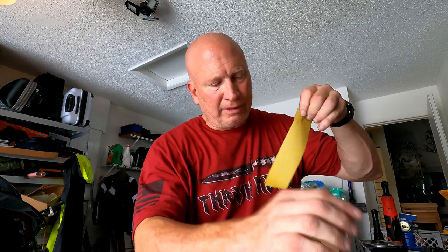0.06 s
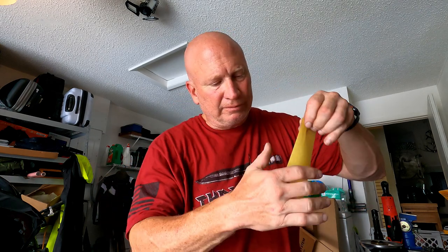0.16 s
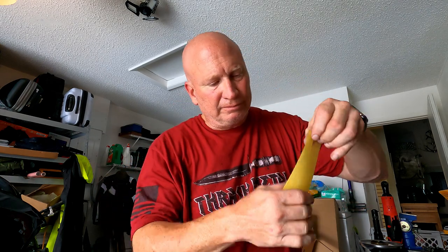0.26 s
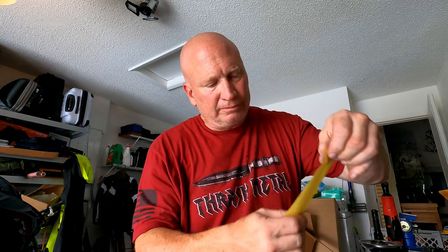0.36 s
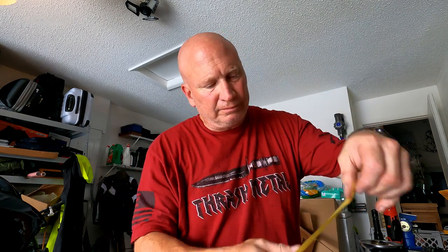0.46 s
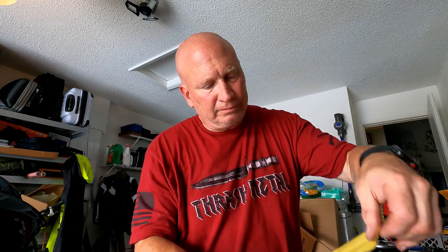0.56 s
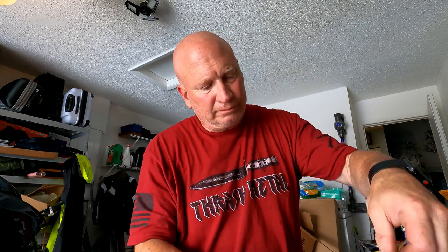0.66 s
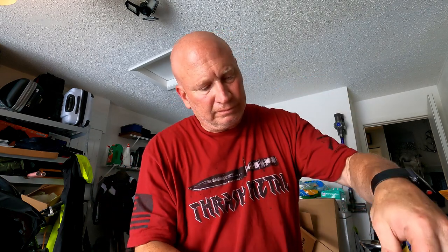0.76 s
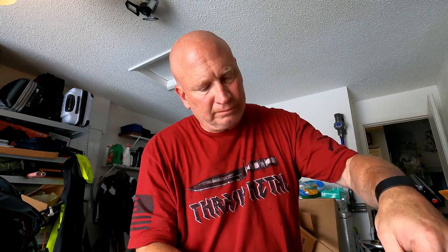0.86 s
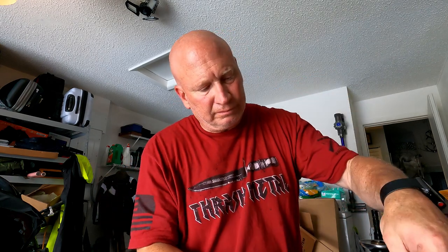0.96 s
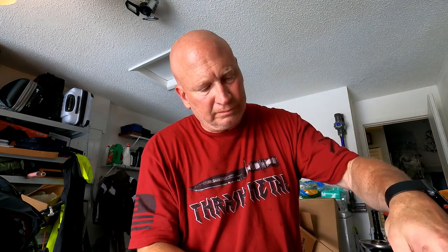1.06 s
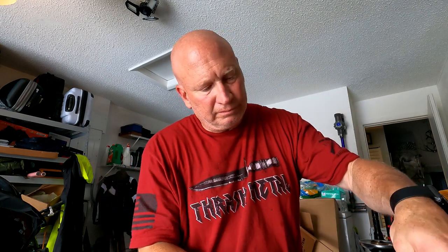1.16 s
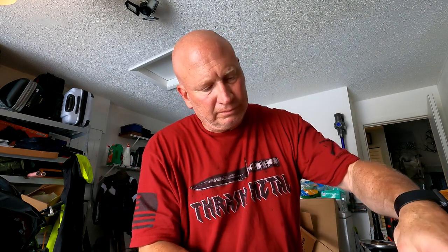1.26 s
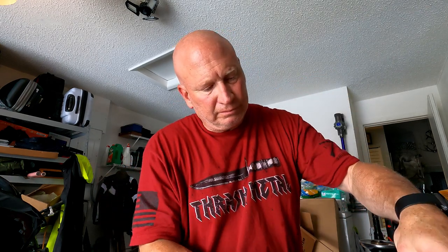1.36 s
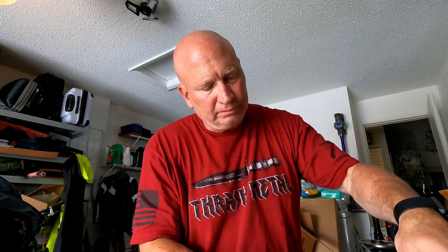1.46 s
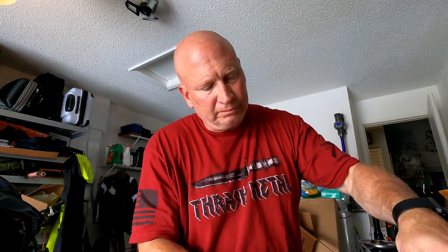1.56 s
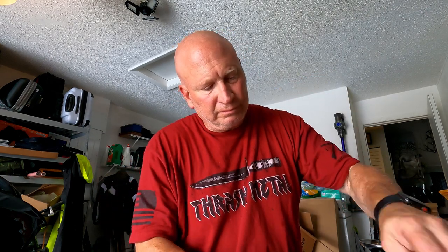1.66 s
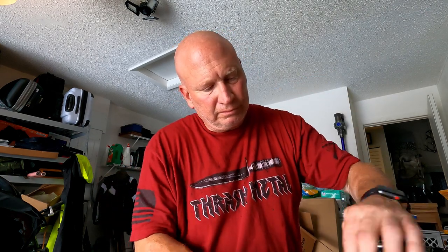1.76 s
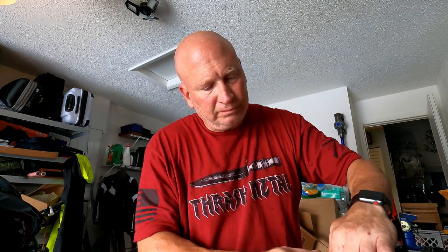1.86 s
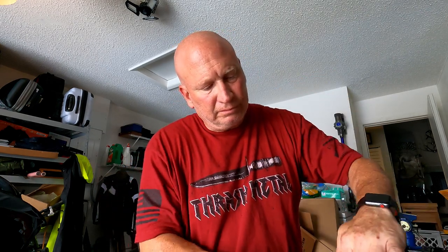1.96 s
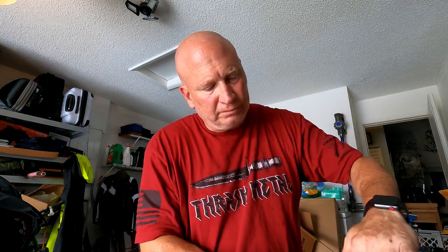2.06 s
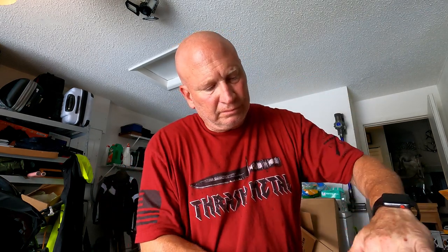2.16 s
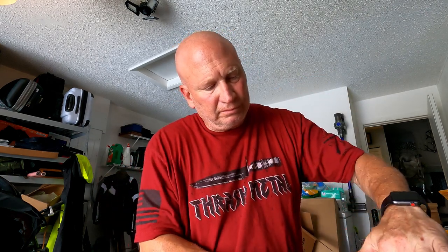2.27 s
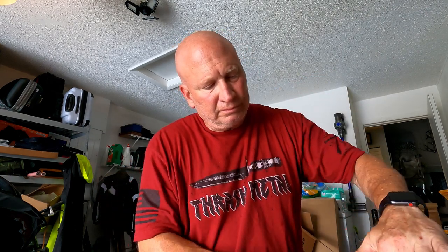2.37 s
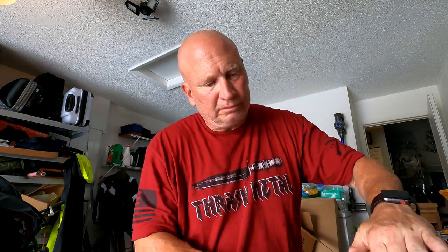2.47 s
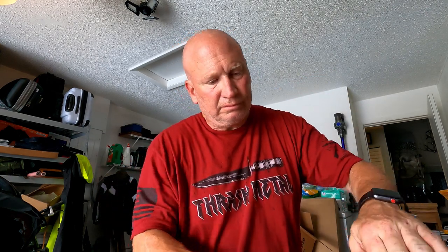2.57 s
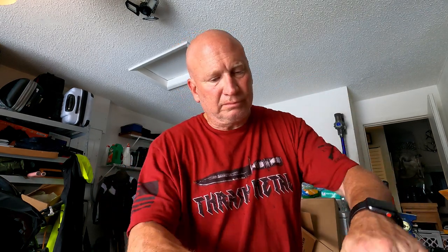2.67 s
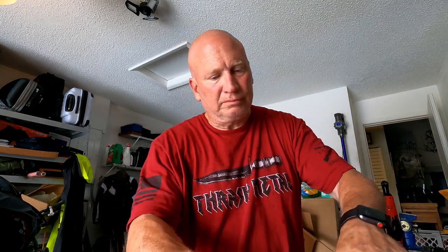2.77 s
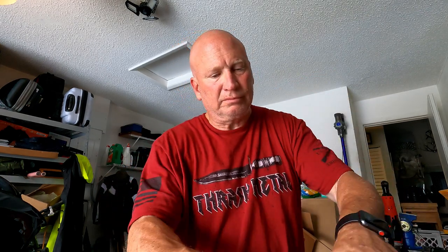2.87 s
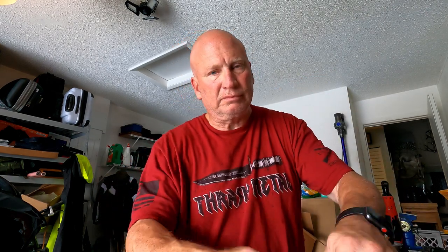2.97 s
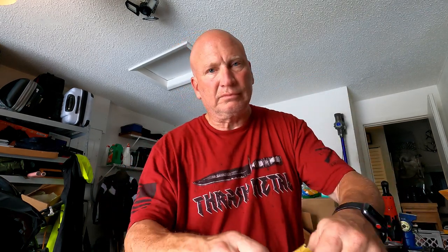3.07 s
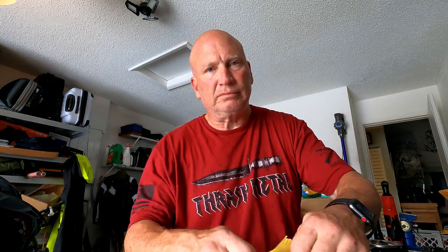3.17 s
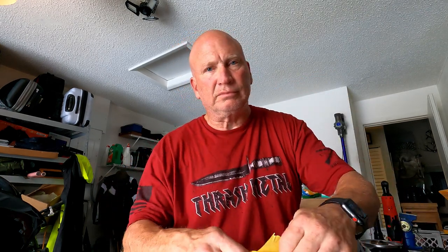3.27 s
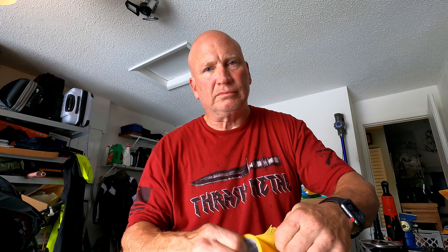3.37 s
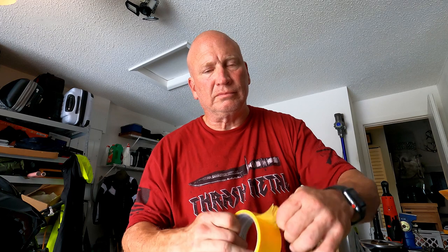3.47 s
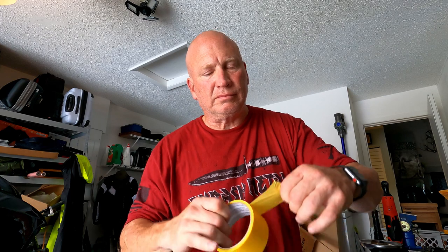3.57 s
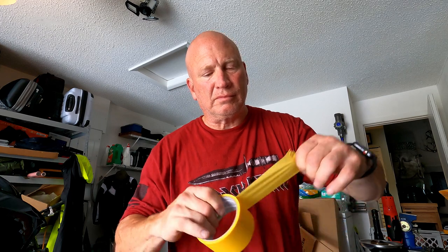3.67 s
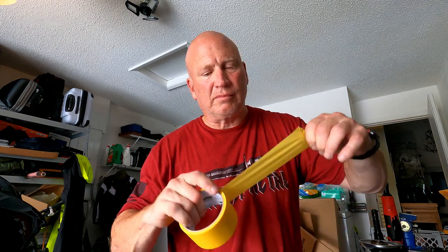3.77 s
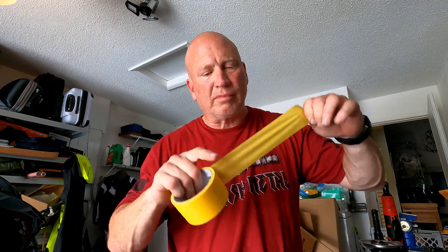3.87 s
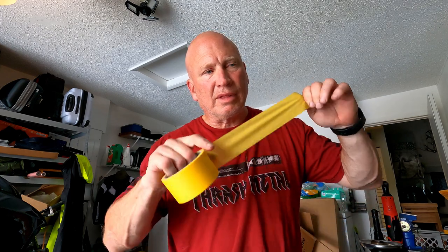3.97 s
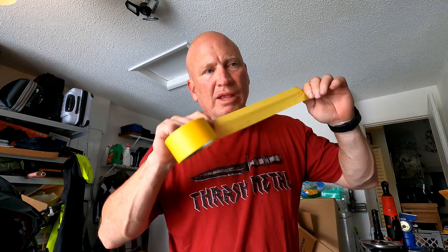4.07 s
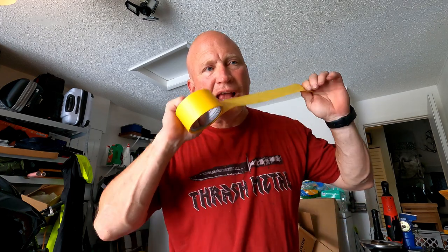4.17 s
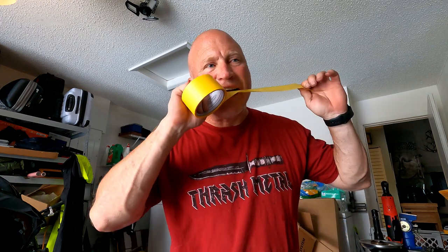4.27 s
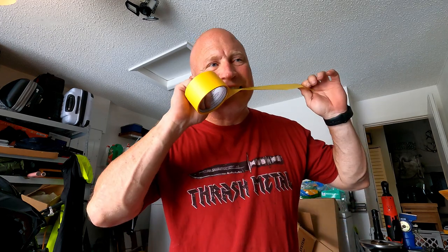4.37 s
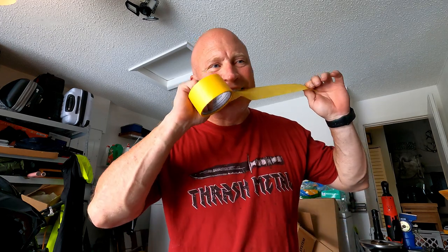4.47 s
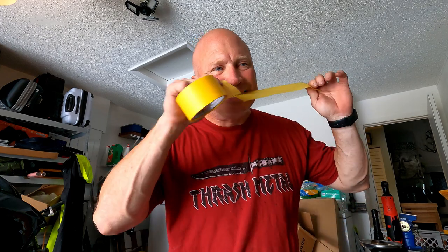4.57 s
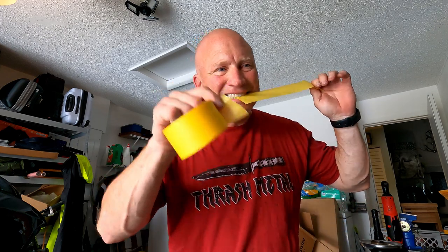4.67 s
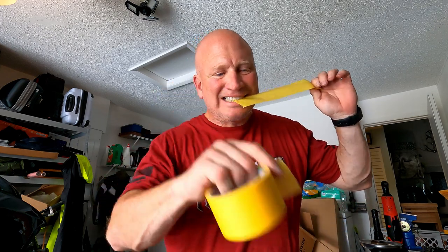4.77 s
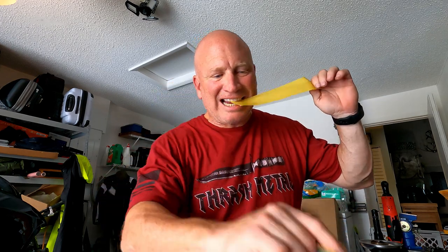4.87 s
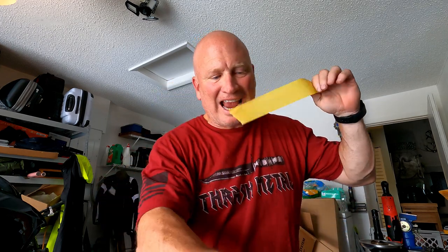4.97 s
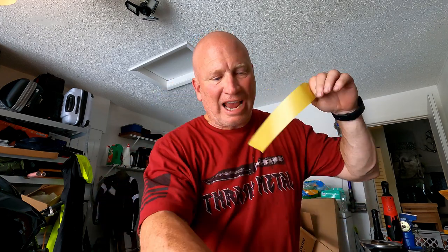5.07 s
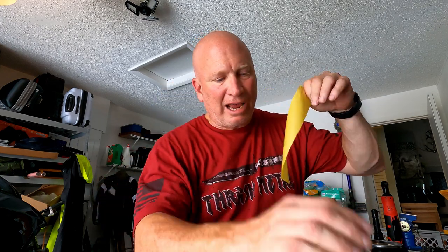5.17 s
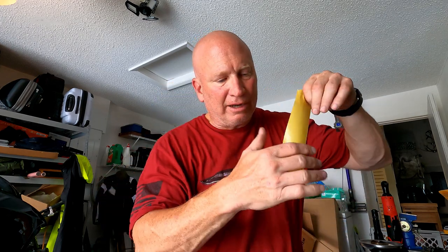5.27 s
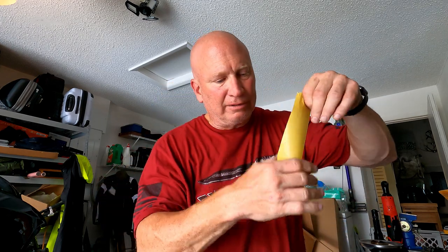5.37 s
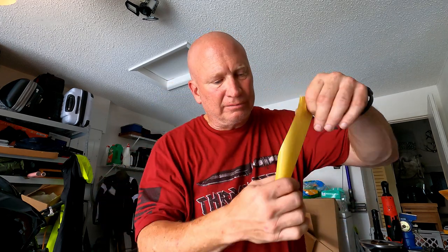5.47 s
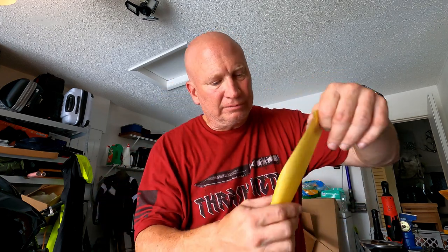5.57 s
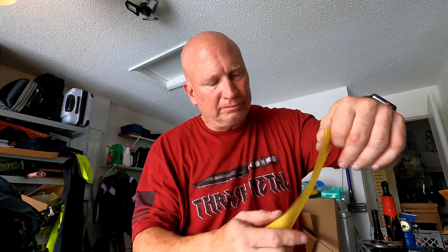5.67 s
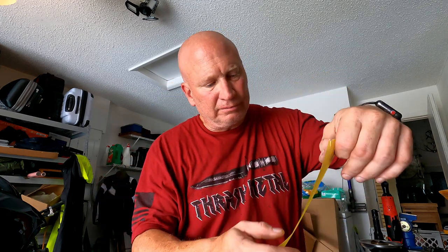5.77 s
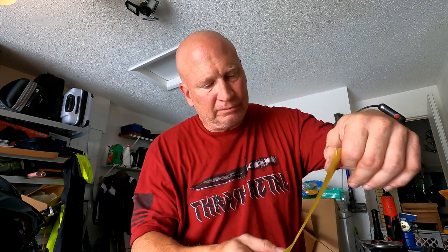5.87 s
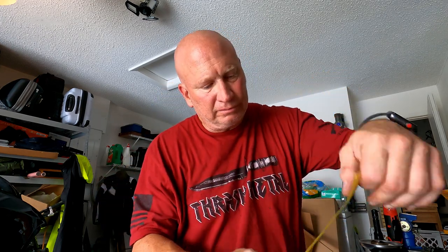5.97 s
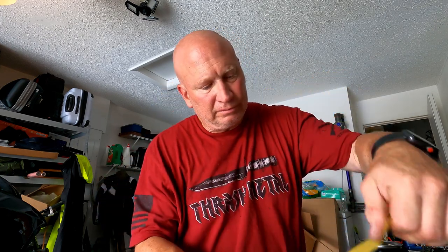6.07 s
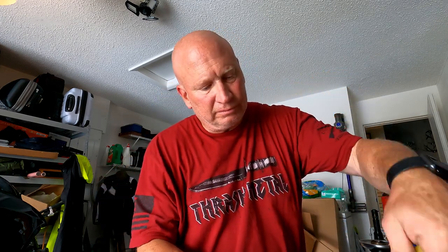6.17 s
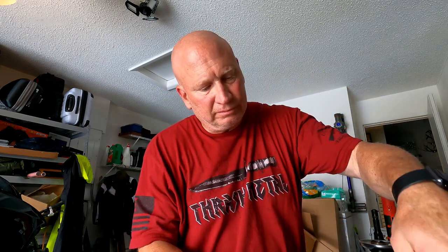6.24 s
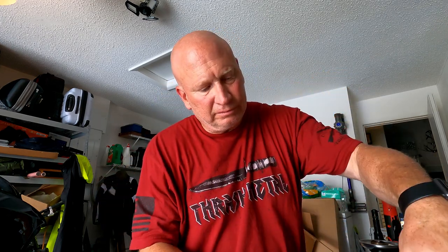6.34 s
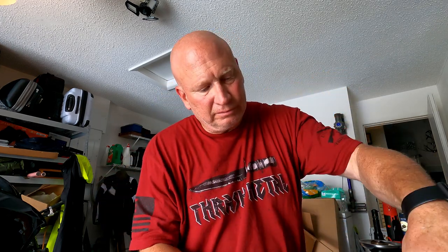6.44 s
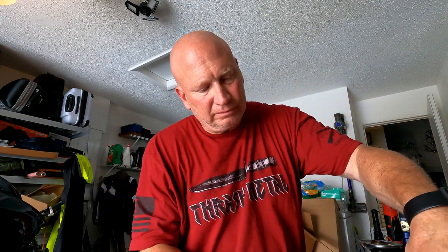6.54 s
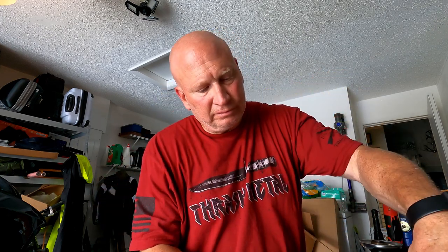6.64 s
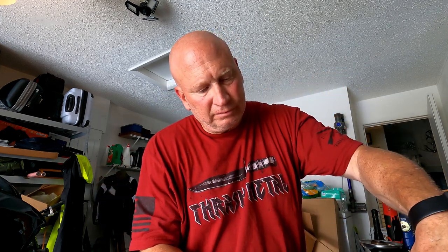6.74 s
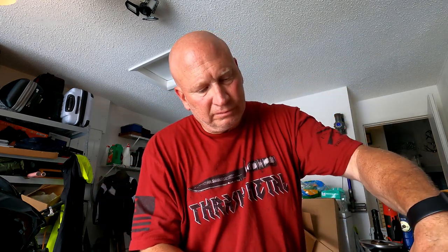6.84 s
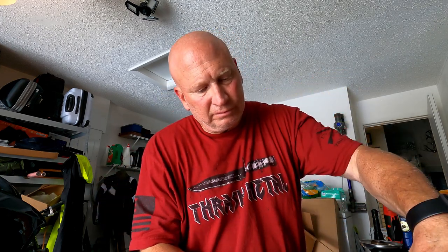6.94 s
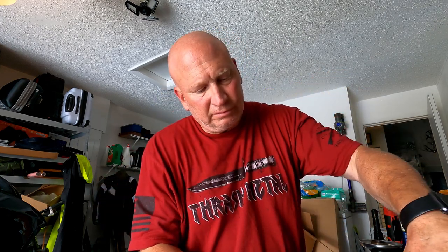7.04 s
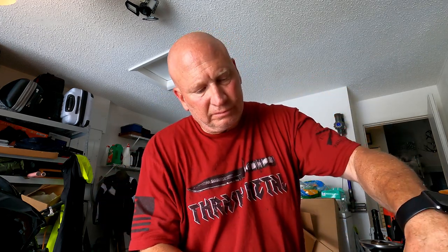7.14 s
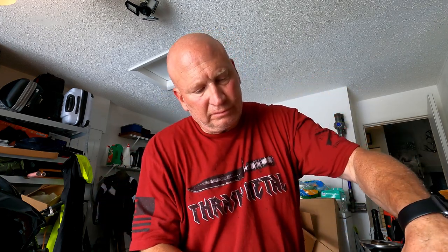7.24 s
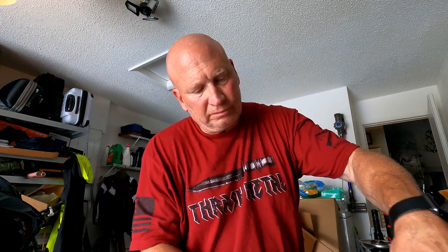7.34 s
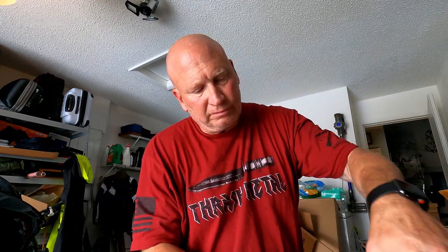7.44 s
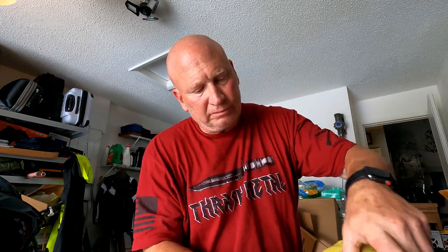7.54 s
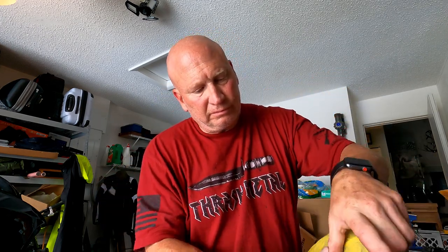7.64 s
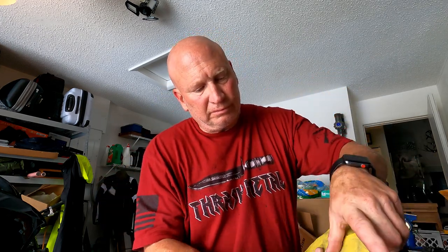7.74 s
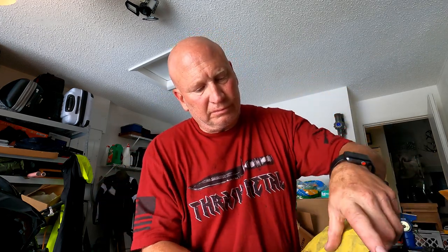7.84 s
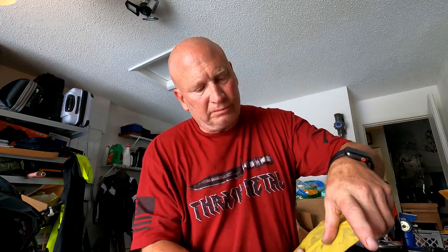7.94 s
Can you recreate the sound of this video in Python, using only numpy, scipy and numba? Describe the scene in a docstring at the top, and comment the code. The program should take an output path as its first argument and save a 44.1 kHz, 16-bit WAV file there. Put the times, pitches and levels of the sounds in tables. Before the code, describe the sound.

A close stereo microphone in a small garage picks up faint uneven rumble, low hum and soft hiss throughout. From 0 to 0.4 s a tape roll wobbles on a workbench in rapid hollow knocks, strongest near 0.33 s, with scuffing and a short bench rattle. Quiet rustling and soft taps follow; crisp snaps and a nail scrape come at 1.5 s, then a cluster of dull finger thumps from 2.4 to 2.8 s. After a lull, a strip peels from 3.5 to 4.1 s, a gritty rasp starting thin and high, swelling and sinking quickly. Small clicks lead to a short crackling tear at 4.57 s. At 5.07 s the roll drops loudly, knocking again until 5.25 s. Faint creases and rustles continue, with sharp snaps around 6.97 and 7.1 s, then soft taps and light handling until 8 s.

```python
"""A roll of paper tape is dropped on a workbench and wobbles to rest: each contact is a sum of decaying modes.
Strips are smoothed down by hand: grains of friction noise, nail scrapes, taps, and puffs from creasing tape.
A new strip is peeled off with a falling rasp, glue clicks driving a span whose modes sink; it is torn,
a burst of crackling noise, and the roll is dropped again.
A garage hums and rumbles faintly, in shaped noise and wavering tones, around a close stereo microphone."""
import sys
import numpy as np
from scipy import signal
from scipy.fft import rfft, irfft, next_fast_len
from scipy.io import wavfile
from scipy.ndimage import map_coordinates
from numba import njit

SR = 44100
rng = np.random.default_rng(int(sys.argv[2]) if len(sys.argv) > 2 else 0)


def persist_wave(psi):
    """Save psi, clipped to +-1, as 16-bit WAV."""
    counts = np.round(np.clip(psi, -1, 1) * 32767).astype(np.int16)
    wavfile.write(sys.argv[1], SR, np.atleast_2d(counts).T)


N = 352932
TIME = np.arange(N) / SR


def amp(db):
    """Level law: decibels to an amplitude ratio."""
    return 10 ** (np.asarray(db) / 20)


def unit(x):
    """Normalization to an rms of 1."""
    return x / np.sqrt(np.mean(x ** 2) + 1e-20)


def along(points, hz):
    """Interpolation of (frequency, value) points on a logarithmic frequency axis."""
    point_hz, value = np.transpose(points)
    return np.interp(np.log(hz + 1), np.log(point_hz + 1), value)


def curves(rows, silent=None):
    """Linear interpolation in time: one curve for each column after the first; silent is the value outside."""
    s, *columns = np.transpose(rows)
    return [np.interp(TIME, s, column, silent, silent) for column in columns]


def wobble(rate):
    """Slow random modulation: a smooth curve through rate random knots a second."""
    knots = rng.standard_normal(int(N * rate / SR) + 4)
    return map_coordinates(knots, [TIME * rate])


def filtered(x, response):
    """Linear filtering: the spectrum of x times a response of frequency."""
    m = next_fast_len(N + SR // 2)  # padded, so that the end does not wrap onto the start
    return irfft(rfft(x, m) * response(np.fft.rfftfreq(m, 1 / SR)), m)[..., :N]


def coloured(x, spectrum):
    """Spectral shaping by (Hz, dB) points, to an rms of 1."""
    return unit(filtered(x, lambda hz: amp(along(spectrum, hz))))


def crackle(rate, spread_db, share):
    """Shot noise: sparse clicks of widely spread size hold a share of the power, steady noise the rest."""
    u = rng.random((3, N))
    sign = np.sign(u[1] - .5)
    size = amp(-spread_db * np.log(u[2] + 0.025))
    clicks = (u[0] < rate / SR) * sign * size
    share = np.clip(share, 0, 1)
    return np.sqrt(share) * unit(clicks) + np.sqrt(1 - share) * rng.standard_normal(N)


def ring(modes, t, scatter_db, rise):
    """Modal decay: damped sines, scattered in level and pitch, after a contact of rise seconds; peak 1."""
    x = np.zeros(len(t))
    for hz, db, t60 in modes:
        decay = amp(db + rng.normal(0, scatter_db) - 60 * t / t60)
        x += decay * np.sin(2 * np.pi * (hz * rng.normal(1, 0.038) * t + 0.45 * rng.random()))
    x = x * (1 - np.exp(-(t / rise) ** 2))
    return x / np.abs(x).max()


def add(track, s, x):
    """Superposition: mixes x into track from time s."""
    part = track[round(s * SR):][:len(x)]
    part += x[:len(part)]


@njit
def resonate(x, pole, gain):
    """Time-varying resonance: one complex pole that moves from sample to sample."""
    y, state = np.zeros(len(x)), 0j
    for i in range(len(x)):
        state = state * pole[i] + gain[i] * x[i]
        y[i] = state.real
    return y


# likeness of left and right in the diffuse noise: frequency [Hz], correlation [1]
LIKENESS = [(60, 1), (180, 0.93), (550, 0.46), (1650, 0.18), (4970, 0.4), (15000, 0.51)]


def wide(spectrum):
    """Partial coherence: mid and side noise share the power so that left and right correlate as LIKENESS says."""
    def response(hz):
        turn = np.arccos(np.clip(along(LIKENESS, hz), -1, 1)) / 2
        return amp(along(spectrum, hz)) * np.array([np.cos(turn), np.sin(turn)])

    mid, side = filtered(rng.standard_normal((2, N)), response)
    return unit(np.array([mid + side, mid - side]))


# garage background over time: time_s [s], rumble_db [dB], drone_db [dB]
ROOM_LEVELS = [(0.0, -63, -41), (0.22, -45, -46.5), (0.62, -50, -54), (1.24, -48, -51.5),
               (2.12, -43, -46.5), (3.14, -46.5, -52.5), (3.5, -47, -52), (3.74, -43.5, -61),
               (3.88, -54, -48), (4.21, -49.5, -52), (4.9, -49, -52), (5.24, -46.5, -52.5),
               (5.59, -49, -52.5), (6.08, -49, -54), (6.39, -44, -52.5), (6.95, -52, -50), (7.42, -46, -49),
               (8.0, -47.5, -49.5)]
# noise spectra of the garage: frequency [Hz], density [dB per Hz]
RUMBLE_SPECTRUM = [(12, -39), (20, 1), (60, 7.5), (78, -4), (91, -27), (110, -9.5), (140, -47), (240, -120)]
DRONE_SPECTRUM = [(53, -18.5), (90, 0.5), (124, -2.5), (287, -13), (323, -16.5), (347, -14.5), (600, -25.5),
                  (780, -63), (1320, -120)]
HISS_SPECTRUM = [(290, -29), (500, -9.5), (529, -13), (788, -11.5), (1320, 0), (2360, -11), (2570, -8.5),
                 (2880, -11.5), (5160, -10.5), (7580, -18.5), (12100, -38.5), (15000, -56)]
# machine tones: pitch_hz [Hz], level_db [dB], change_start_s [s], change_db [dB]
MACHINE_TONES = [(114.2, -53.5, 9, 0), (221, -61.5, 9, 0), (354.4, -63.5, 9, 0), (473, -67, 9, 0),
                 (2124, -75, 9, 0), (2533, -66.5, 2.86, -9)]
HISS_DB, TONE_CHANGE_S = -61, 0.3


def garage():
    """Slowly varying noise and wavering tones: lumpy rumble, a drone, hiss and machine hum."""
    rumble_db, drone_db = curves(ROOM_LEVELS)
    tones = np.zeros(N)
    for hz, db, s, change_db in MACHINE_TONES:
        level_db = db + change_db * np.clip((TIME - s) / TONE_CHANGE_S, 0, 1) + 2.9 * wobble(5.4)
        tones += amp(level_db) * np.sin(2 * np.pi * hz * TIME + 1.0 * wobble(8))
    rumble = amp(rumble_db + 0.97 * wobble(16.0)) * wide(RUMBLE_SPECTRUM)
    drone = amp(drone_db + 2.16 * wobble(11)) * wide(DRONE_SPECTRUM)
    hiss = amp(HISS_DB + 0.46 * wobble(7.1)) * wide(HISS_SPECTRUM)
    return rumble + drone + hiss + tones


# swells of rustle and scuffing, from hands or from the roll settling: loudest_s [s], rise_s [s], fall_s [s],
# rustle_db [dB], brightness_db [dB against the rustle], scuff_db [dB]
FRICTION_SWELLS = [(0.003, 0.15, 0.15, -56, -11, -30.5), (0.078, 0.018, 0.014, -55, -9, -47),
                   (0.151, 0.0036, 0.025, -51, -5, -54), (0.227, 0.0028, 0.019, -41, -11, -65),
                   (0.4, 0.18, 0.29, -52.5, -5, -51.5), (0.709, 0.02, 0.026, -54.5, -11, -56),
                   (0.8, 0.043, 0.032, -58.5, -15, -76), (1.471, 0.71, .05, -62.5, -11, -67),
                   (1.493, 0.014, 0.19, -54.5, 5.5, -49), (1.57, 0.072, 0.08, -48.5, -10, -55),
                   (1.68, 0.24, 0.35, -57.5, -12, -56.5), (1.93, 0.011, 0.057, -59.5, 4, -57),
                   (2.12, 0.19, 0.55, -58.5, -2.5, -56), (2.26, 0.22, 0.1, -70.5, 13, -72),
                   (2.505, 0.015, 0.069, -67, -17, -49), (2.56, 0.14, 0.13, -58, -11.5, -47.5),
                   (2.73, .02, 0.035, -73, 10, -66), (2.829, 0.043, 0.033, -60, 5, -45.5),
                   (2.92, .02, 0.063, -63.5, 3, -62), (3.05, 0.16, 0.19, -62, -1, -78),
                   (3.28, 0.18, 0.097, -62, -2, -76), (3.5, 0.21, 0.067, -60.5, -1.5, -72),
                   (4.1, 0.054, 0.39, -56, -4.5, -76), (4.5, 0.14, 0.11, -57.5, -12, -60),
                   (4.555, 0.0091, 0.072, -52.5, 10, -58), (4.64, 0.15, 0.35, -55, -5, -62),
                   (4.987, 0.088, 0.053, -52.5, -3.5, -68), (5.2, 0.18, 0.14, -59.5, -6, -37),
                   (5.447, 0.019, 0.081, -58.5, -8, -53.5), (5.62, 0.13, 0.045, -56.5, -11.5, -66.5),
                   (5.71, 0.11, 0.12, -61.5, -4.5, -85), (5.97, 0.13, 0.15, -61, -7, -67),
                   (6.13, 0.017, 0.093, -58.5, -7, -68), (6.6, 0.78, 0.85, -62, -12, -67),
                   (6.88, 0.08, 0.26, -70, 4, -74), (7.05, 0.078, 0.2, -58, -3, -59),
                   (7.11, 0.017, 0.13, -54.5, 1.5, -50.5), (7.3, 0.16, 0.38, -60, -18, -56.5),
                   (7.55, 0.28, 0.098, -69, 8, -75), (7.73, 0.11, 0.17, -60.5, -11, -57.5),
                   (7.9, 0.34, 0.26, -60.5, -4.5, -59)]
SWELL_EDGE_DB = 20  # a swell is this much quieter one rise before and one fall after its loudest moment


def rustle_and_scuff():
    """Friction noise: clumps of rustling and scuffing, from hands or from the roll settling, swell and fade."""
    t = TIME[::32]  # the swells are slow enough for a coarse time grid
    levels = np.zeros((3, len(t)))
    for s, rise, fall, rustle_db, bright_db, scuff_db in FRICTION_SWELLS:
        swell = amp(-SWELL_EDGE_DB * np.where(t < s, (s - t) / rise, (t - s) / fall))
        levels += amp([[rustle_db], [rustle_db + bright_db], [scuff_db]]) * swell
    rustle, bright, scuffing = [np.interp(TIME, t, level) for level in levels]
    grains = crackle(rate=1600, spread_db=5.5, share=0.37) * amp(2.67 * wobble(45))
    # the three spectra: (Hz, dB)
    body = coloured(grains, [(1000, -3.0), (2000, 7.0), (4200, 8.5), (6500, -5.5), (8000, -35)])
    edge = coloured(grains, [(5000, -7.5), (7000, 0.5), (10000, -10.5), (12500, -14.5), (15500, -47.0)])
    scuff = coloured(crackle(rate=600, spread_db=4.5, share=0.6),
                     [(250, 1.0), (450, -5.5), (900, -5.5), (1600, -7.5), (2600, -23.5), (5000, -62)])
    return rustle * body + bright * edge + scuffing * amp(1.35 * wobble(40)) * scuff


# the roll's rim meets the bench: start_s [s], slap_db [dB], slap_hz [Hz], then against the slap:
# ring_db [dB], tick_db [dB], bench_top_db [dB], frame_db [dB]; contact_s [s]
RIM_CONTACTS = [(0.012, -38, 1050, 6, -17, -12, 6, 0.0013), (0.079, -21.5, 930, -4, -29, -2, -17, 0.00054),
                (0.0906, -29.5, 980, -7, -25, -6, -13, 0.00097),
                (0.1612, -15.5, 910, -1.5, -13, -8, -17, 0.0008),
                (0.2304, -25, 840, 1.5, -22, 0.5, -11, 0.0016),
                (0.2874, -23, 894, -2.5, -10, -2, -9, 0.00074),
                (0.329, -23.5, 1040, -11, -19, -8, -22, 0.00048),
                (0.334, -10, 920, -8, -21, -17.5, -24, 0.0013),
                (0.359, -26, 890, -9, -19, -12, -4.5, 0.00062), (0.366, -42, 900, -7, -20, -12, 7, 0.001),
                (0.397, -35, 1050, 3, -13, -12, -28, 0.00039),
                (5.0693, -4.5, 1044, -16.5, -8, -8, -21.5, 0.00059),
                (5.0833, -8.5, 1200, -10.5, -3.5, -9.5, -12.5, 0.00046),
                (5.095, -33, 1500, -8, -15, -20.5, -12, 0.00051),
                (5.153, -21, 1010, 0, -27, -12, -7.5, 0.0014),
                (5.2013, -11, 1010, -2.5, -19, -21, -24, 0.00067),
                (5.2175, -37, 990, -8, -25, -22, -25, 0.00076),
                (5.2315, -29, 1040, -8, -25, -28.5, -22, 0.00079),
                (5.2362, -12, 970, -6.5, -22, -22, -27, 0.001),
                (5.2534, -29.5, 1300, -9, 1, -26, -17, 0.00015),
                (5.264, -48, 1050, -8, -13, -21, -15, 0.00076)]
# modes of the roll, the bench top and the bench frame: pitch_hz [Hz], level_db [dB], t60_s [s]
ROLL_MODES = [(740, -4.5, 0.026), (903, 6, 0.035), (954, 4, 0.042), (1230, 6, 0.024), (1493, -0.5, 0.018),
              (1730, -1, 0.017), (2260, -10, 0.024)]
BENCH_TOP_MODES = [(232, -4, 0.1), (317, 4, 0.073), (349, 2, 0.053), (402, -12, 0.05)]
FRAME_MODES = [(57.7, -5, 0.47), (104, 6, 0.12), (135, -12, 0.12), (192, -2, 0.1)]


def drops():
    """Impact excitation: each contact is one slap that ticks, rings the cardboard roll and thumps the bench."""
    out, frame, t = np.zeros(N), np.zeros((2, N)), TIME[:SR // 4]
    buzz_band = signal.butter(3, [600, 2300], "band", fs=SR)
    for s, db, hz, ring_db, tick_db, top_db, frame_db, contact in RIM_CONTACTS:
        slap = -ring([(hz, -2.5, 0.0085), (1.35 * hz, -8, 0.008)], t, 0.71, rise=contact)
        tick = ring([(2250, 6.5, 0.0077), (3280, 3, 0.005), (4500, 2.7, 0.0031)], t, 1.6, rise=0.32 * contact)
        buzz = unit(signal.lfilter(*buzz_band, rng.standard_normal(len(t))))
        roll = ring(ROLL_MODES, t, 3.6, rise=2 * contact)
        roll = roll + amp(-15.5 - 60 * t / 0.042) * buzz  # loose tape layers buzz along
        top = ring(BENCH_TOP_MODES, t, 1.3, rise=0.0015)
        add(out, s, amp(db) * (slap + amp(tick_db) * tick + amp(ring_db) * roll + amp(top_db) * top))
        both, apart = [amp(db + frame_db) * ring(FRAME_MODES, t, 0.47, rise=0.0013) for _ in range(2)]
        for port, sign in zip(frame, (1, -1)):  # the frame shakes the two microphone ports a little differently
            add(port, s, both + sign * amp(-7.5) * apart)
    return out, frame


# noise of the shaken bench: frequency [Hz], density [dB per Hz]
BOOM_SPECTRUM = [(40, -19), (70, 3.5), (130, -6), (220, 3.5), (330, -4.5), (500, -11), (1000, -67)]
RATTLE_SPECTRUM = [(150, -1), (250, 2), (450, -4), (650, -3.5), (1000, -9), (1600, -15), (2400, -22),
                   (3200, -38), (5000, -66)]
BOOM_DB, BOOM_T60_S, RATTLE_DB, RATTLE_T60_S = -27.5, 0.22, -24.5, 0.15  # levels against the slap


def shudder():
    """Reverberant decay in a structure: after each contact the bench booms and loose things on it rattle."""
    boom, rattle, t = np.zeros(N), np.zeros(N), TIME[:SR // 2]
    for s, db, *_ in RIM_CONTACTS:
        add(boom, s, amp(db + BOOM_DB - 60 * t / BOOM_T60_S) * (1 - np.exp(-t / 0.0023)))
        add(rattle, s, amp(db + RATTLE_DB - 60 * t / RATTLE_T60_S) * (1 - np.exp(-t / 0.0026)))
    boom = boom * coloured(rng.standard_normal(N), BOOM_SPECTRUM)
    return boom + rattle * coloured(rng.standard_normal(N), RATTLE_SPECTRUM)


# tape creases and sticks: start_s [s], level_db [dB], pitch_hz [Hz], t60_s [s], edge_db [dB against the puff]
TAPE_SNAPS = [(0.224, -36, 1540, 0.011, -30), (0.771, -48, 1510, 0.013, -25),
              (0.796, -45.5, 1910, 0.015, -24), (0.9404, -45.5, 2640, 0.019, -8),
              (1.49, -35, 1580, 0.0099, -28), (1.491, -21, 3970, 0.014, -27),
              (1.4957, -39, 4100, 0.015, -19), (1.514, -31, 3860, 0.015, -23),
              (1.527, -30, 3980, 0.018, -18), (1.5619, -21.5, 3720, 0.02, -20),
              (1.574, -34, 4000, 0.023, -24), (1.589, -42, 4200, 0.015, -24),
              (1.926, -41, 1690, 0.014, -15), (2.0298, -42.5, 1680, 0.022, -30),
              (2.1031, -50, 3860, 0.016, -17), (2.3795, -53, 4800, 0.0053, -40),
              (2.8045, -46, 3760, 0.015, -19), (4.1084, -32.5, 4400, 0.018, -29),
              (4.157, -36, 3340, 0.014, -27), (4.3793, -45, 5040, 0.015, -19),
              (4.455, -41.5, 1580, 0.011, -24), (4.469, -39, 1620, 0.024, -40),
              (4.4771, -31.5, 1590, 0.023, -18), (4.512, -27, 4400, 0.0099, -22),
              (4.5122, -33.5, 2100, 0.016, -30), (4.7714, -30, 1570, 0.011, -38),
              (4.78, -37, 1460, 0.013, -29), (4.895, -40, 1630, 0.018, -26),
              (4.9797, -26, 5030, 0.016, -25), (4.9868, -30.5, 1760, 0.005, 2),
              (5.439, -32.5, 3530, 0.042, -12.5), (5.4884, -40.5, 2810, 0.064, -18),
              (5.5842, -49, 4220, 0.015, -25), (5.7386, -43, 3220, 0.035, -25),
              (5.7573, -47, 2530, 0.018, -24), (5.831, -42, 4480, 0.022, -14),
              (5.958, -43, 3630, 0.019, -25), (5.9983, -42, 4560, 0.023, -25),
              (6.0188, -42, 3760, 0.021, -27), (6.124, -40.5, 4370, 0.022, -18),
              (6.147, -45, 4200, 0.018, -20), (6.165, -45, 2800, 0.022, -20),
              (6.9667, -19, 4870, 0.013, -37), (7.1069, -22, 5100, 0.052, -28),
              (7.1085, -31.5, 1270, 0.027, -30), (7.109, -32.5, 2700, 0.033, -30),
              (7.1291, -19, 4260, 0.022, -2), (7.243, -37, 3280, 0.015, -23),
              (7.307, -36, 3200, 0.018, -10), (7.387, -41, 1450, 0.015, -23),
              (7.388, -45, 4200, 0.012, -23), (7.399, -43, 1100, 0.028, -30),
              (7.4794, -39, 1400, 0.04, -30), (7.707, -37.5, 3040, 0.027, -25),
              (7.7263, -32.5, 3880, 0.018, -27)]


def snaps():
    """Sudden release: a short puff of noise around the crease's pitch, with a thin bright edge."""
    out, t = np.zeros(N), TIME[:SR // 6]
    edge_band = signal.butter(3, [6000, 12000], "band", fs=SR, output="sos")
    for s, db, hz, t60, edge_db in TAPE_SNAPS:
        decay_rate = 60 / max(t60, .003) * np.array([[1], [2.2]])  # dB per second; the edge dies faster
        noise = rng.standard_normal((2, len(t))) * amp(-decay_rate * t)
        noise[:, 0] = 4.1  # the crease gives way at once
        puff_band = signal.butter(2, [0.68 * hz, 1.36 * hz], "band", fs=SR, output="sos")
        puff = signal.sosfilt(puff_band, noise[0])
        edge = signal.sosfilt(edge_band, noise[1])
        add(out, s, amp(db) * (puff / np.abs(puff).max() + amp(edge_db) * edge / np.abs(edge).max()))
    return out


# a fingernail drags over the tape: middle_s [s], half_length_s [s], centre_hz [Hz], level_db [dB]
NAIL_SCRAPES = [(0.436, 0.035, 3120, -49.5), (1.577, 0.028, 4450, -38.5), (2.814, 0.015, 4030, -52.5),
                (3.263, 0.024, 3400, -53), (6.882, 0.018, 4830, -58)]


def scrapes():
    """Friction exciting a resonance: soft swells of grit in one band."""
    grit = crackle(rate=1500, spread_db=2.0, share=0.83)
    out = np.zeros(N)
    for s, half, hz, db in NAIL_SCRAPES:
        band = signal.butter(2, [0.8 * hz, 1.13 * hz], "band", fs=SR, output="sos")
        swell = np.exp(-((TIME - s) / half) ** 2)
        out += amp(db) * swell * unit(signal.sosfilt(band, grit))
    return out


# fingers tap the work piece: start_s [s], push_db [dB], push_hz [Hz], ring_db [dB], edge_db [dB]
FINGER_TAPS = [(0.7157, -51, 108, -55, -37), (0.8674, -33, 150, -58, -39), (1.23, -42, 152, -47, -36.5),
               (1.793, -45, 178, -49, -52), (2.046, -40, 112, -50, -36), (2.3791, -22.5, 121, -61, -23.5),
               (2.501, -26.5, 152, -47, -41), (2.523, -30.5, 115.4, -57, -54),
               (2.545, -30.5, 120, -43, -55), (2.566, -31.5, 221, -35.5, -45), (2.575, -38, 250, -41, -42),
               (2.589, -29.5, 89, -44, -58), (2.608, -36, 94.2, -58, -55), (2.718, -23.5, 163, -43, -44),
               (2.728, -21, 166, -46, -52), (2.777, -27.5, 313, -38, -38), (2.785, -28.5, 111, -66, -57),
               (6.641, -46, 90.5, -61, -41.5), (6.667, -48, 92, -50, -36), (7.129, -30, 480, -40, -22),
               (7.2415, -32.5, 104, -37.5, -48), (7.307, -31.5, 249, -29.5, -52),
               (7.4756, -28, 105, -35.5, -38)]
# modes of the board: pitch_hz [Hz], level_db [dB], t60_s [s]
BOARD_MODES = [(490, -10, .09), (541, 0.5, 0.18), (593, -4.5, 0.063), (700, 5, 0.028), (880, 2.5, 0.022),
               (1080, -1.5, 0.049), (1340, -1, 0.028), (1800, -5, 0.016)]
NAIL_S = 0.00012  # contact time of a fingernail
PUSH_LAG_S, PUSH_CYCLES = 0.0013, 5.5  # the fingertip lands after the nail; cycles until 60 dB down


def taps():
    """Hard and soft impact: the nail's edge and the board's ring, then a soft push that hardly rings."""
    out, t = np.zeros(N), TIME[:SR // 4]
    for s, db, hz, ring_db, edge_db in FINGER_TAPS:
        turns = hz * t
        push = -np.sin(2 * np.pi * turns) * amp(-60 * turns / PUSH_CYCLES) * (1 - np.exp(-t / 0.00085))
        overtone = ring([(3.67 * hz, 0, 2.0 / hz)], t, 0.25, rise=0.00066)
        push = push / np.abs(push).max() + amp(-15) * overtone
        pulse = -np.e * t / NAIL_S * np.exp(-t / NAIL_S)
        clack = ring([(820, 2, 0.0048), (1290, -3.5, 0.012), (1890, 6, 0.005)], t, 0.75, rise=0.00057)
        edge = pulse + amp(-12.5) * clack
        add(out, s + PUSH_LAG_S, amp(db) * push)
        add(out, s, amp(ring_db) * ring(BOARD_MODES, t, 0.86, rise=0.0016) + amp(edge_db) * edge)
    return out


# free span of tape while it is peeled: time_s [s], lowest_mode_hz [Hz],
# ringing of the first, the second and the higher modes [dB, dB, dB]
FREE_SPAN = [(3.52, 3830, -7, -6, -6), (3.551, 3180, -5, -5, -3), (3.601, 1270, 0, 0, -4),
             (3.63, 860, 2, 5, 6), (3.661, 576, -1, -3, -2), (3.695, 434, -1, -6, -1),
             (3.73, 340, 4.5, -2, 6), (3.79, 243, -0.5, -1.5, -5), (3.85, 183, 1.5, -4, -5),
             (3.89, 168, 4, -1.5, -6), (3.94, 153, 1, 2, 1), (3.99, 138, 2, -13, -9),
             (4.08, 116, 0, -6, -7)]
# modes of the span: multiple of the lowest [1], sharpness Q of each resonator [1], level_db [dB]
MODE_SERIES = [(1.0, 3.4, -7.5), (3.3, 5.1, -9.5), (6.05, 10, -9.5), (9.4, 14, -19), (11.2, 12, -20),
               (13.2, 21, -21), (16, 15, -18.5)]
# the pull: time_s [s], rasp_db [dB], treble_db [dB]
PULL_LEVELS = [(3.51, -59, 0), (3.545, -36.5, -6.5), (3.575, -32, -0.5), (3.634, -30.5, 0),
               (3.7, -28.5, 2.5), (3.754, -27.5, 1), (3.81, -33, -2), (3.874, -38.5, -3), (3.968, -34, -2),
               (4.03, -38, -3.3), (4.09, -59.5, -3)]
# glue threads snapping: frequency [Hz], density [dB per Hz]
GLUE_SPECTRUM = [(410, -3.5), (700, -8), (955, -5), (1070, -3.5), (1690, -1), (2000, -2.5), (4130, -2),
                 (11900, -17.5), (15500, -38)]
# how well a span mode is heard at each pitch: pitch_hz [Hz], level_db [dB]
RADIATION = [(110, -2), (200, 1), (340, 1.5), (550, 0.5), (900, -2.5), (1400, 1), (2000, 4), (3200, 5),
             (5000, -2), (9000, -19)]
# the hollow roll colours the rasp: centre_hz [Hz], width_hz [Hz], lift_db [dB]
CORE_RESONANCES = [(351, 68, 6), (543, 80, 8), (2050, 300, 3), (3240, 550, 2), (4400, 500, 2),
                   (5250, 650, 3), (7300, 1200, 5.5)]
TREBLE_HZ = 4600  # the rasp's treble starts here


def hollow_roll(f):
    """Cavity resonance: the response of parallel band-pass lifts."""
    response = 1
    for centre, width, lift_db in CORE_RESONANCES:
        band = 1j * f * width / (centre * centre - f * f + 1j * f * width)
        response = response + (amp(lift_db) - 1) * band
    return response


def peel():
    """Parametric resonance: snapping glue drives the free span, whose modes sink as it lengthens."""
    s, lowest_hz, *ringing_db = np.transpose(FREE_SPAN)
    hz = np.exp(np.interp(TIME, s, np.log(lowest_hz)))
    level_db, treble_db = curves(PULL_LEVELS, -120)
    glue = crackle(rate=6000, spread_db=3.5, share=0.71)
    rasp = coloured(glue, GLUE_SPECTRUM)
    keep = np.exp(-2 * np.pi * 0.51 * hz / SR)
    for _ in range(2):  # a short span radiates little below its lowest mode
        rasp = rasp - resonate(rasp, keep + 0j, 1 - keep)
    for k, (multiple, q, db) in enumerate(MODE_SERIES):
        centre_hz = multiple * hz * (1 + 0.035 * wobble(90))  # the tension flutters
        centre_hz = np.minimum(centre_hz, SR / 2.5)
        damping = np.pi * centre_hz / q / SR
        pole = np.exp(-damping + 2j * np.pi * centre_hz / SR)
        mode = resonate(resonate(glue, pole, 2 * damping), pole, 2 * np.sqrt(damping))
        flicker_db = 2.2 * wobble(90)
        ring_db = np.interp(TIME, s, ringing_db[min(k, 2)])
        rasp = rasp + amp(db + ring_db + along(RADIATION, centre_hz) + flicker_db) * mode
    treble = filtered(rasp, lambda f: 1 / (1 + (TREBLE_HZ / (f + 1)) ** 6))
    rasp = rasp + (amp(treble_db) - 1) * treble
    rasp = rasp * amp(level_db + 0.78 * wobble(220))  # the peel line sticks and slips
    return filtered(rasp, hollow_roll)


# paper fibres tearing: frequency [Hz], density [dB per Hz]
PAPER_SPECTRUM = [(180, -31.5), (300, -19.5), (800, -11.5), (1410, -11), (1810, -9.5), (2700, -12.5),
                  (3170, -3), (3700, -11), (4800, -7.5), (6500, -12), (8000, -18), (11300, -24),
                  (14500, -40), (15500, -66)]
TEAR_S, TEAR_DB, TEAR_ATTACK_S, TEAR_HOLD_S = 4.572, -22, 0.0015, .035
TEAR_TAIL_DB, TEAR_T60_S = -11.5, 0.22  # the last fibres, against the rip


def tear():
    """Successive fracture: a quick run of breaking fibres that stops short; the last ones trail off."""
    t = TIME - TEAR_S
    after_db = np.where(t > TEAR_HOLD_S, TEAR_TAIL_DB - 60 * (t - TEAR_HOLD_S) / TEAR_T60_S, 0)
    shape = np.clip(t / TEAR_ATTACK_S, 0, 1) * amp(TEAR_DB + after_db)
    fibres = coloured(crackle(rate=4500, spread_db=3, share=.6), PAPER_SPECTRUM)
    return shape * amp(2.5 * wobble(300)) * fibres


# reverberation of the room: frequency [Hz], t60_s [s]
WALL_DECAY = [(100, 0.29), (1000, 0.22), (4000, 0.18), (12000, 0.19)]


def walls(x, width):
    """Diffuse reverberation: each frequency dies at its own speed in a random tail."""
    out, step = np.zeros((2, N + SR)), SR // 6
    for start in range(0, N, step):  # each stretch of sound gets its own random diffuse tail
        hz, t, z = signal.stft(rng.standard_normal((2, SR // 3)), SR, nperseg=256)
        decay = amp(-60 * t / along(WALL_DECAY, hz)[:, None])
        mid, side = signal.istft(z * decay, SR, nperseg=256)[1]
        tail = np.array([mid + width * side, mid - width * side])
        answer = signal.fftconvolve(x[None, start:start + step], tail / np.linalg.norm(tail[0]), axes=1)
        out[:, start + 200:][:, :answer.shape[1]] += answer  # 200 samples after the direct sound
    return out[:, :N]


def scene():
    """Superposition of direct sound, placed by level differences, with reverberation and background."""
    knocks, frame = drops()
    rip = peel()
    tape = tear() + snaps() + scrapes() + rustle_and_scuff()
    bench = knocks + taps() + shudder()
    # gains in dB: left, right
    near = rip * amp([[-.55], [.55]]) + tape * amp([[-.15], [.15]]) + bench * amp([[-.1], [.1]]) + frame
    room = amp(-10.5) * walls(tape + rip, width=0.39) + amp(-10.5) * walls(bench, width=0.5)
    return near + room + garage()


# phase between the two microphone ports: frequency [Hz], phase [rad]
PORT_PHASE = [(500, -0.13), (1900, -0.64), (3000, -0.95), (5300, -0.37), (10000, -0.77), (12000, -0.27)]
# the housing scatters sound unlike to each port: frequency [Hz], level_db [dB]
HOUSING_SCATTER = [(600, -40.5), (1500, -17.5), (5000, -18.5), (9000, -14.5), (14000, -1)]
TOP_HZ = 15612  # band limit


def record(dry):
    """Diffraction at two ports: they differ in phase and scattered treble; the band limit cuts the top."""
    echoes = rng.standard_normal(SR // 300)
    scattered = np.convolve(dry.mean(0), echoes / np.linalg.norm(echoes))[:N]
    scattered = filtered(scattered, lambda hz: amp(along(HOUSING_SCATTER, hz)))
    scattered = scattered * wobble(30)  # a slow random wobble keeps the treble diffuse between left and right
    sides = np.array([[1], [-1]])
    return filtered(dry + sides * scattered,
                    lambda hz: np.exp(.5j * sides * along(PORT_PHASE, hz)) * (hz < TOP_HZ))


dry = scene()
out = record(dry)
persist_wave(out)
```